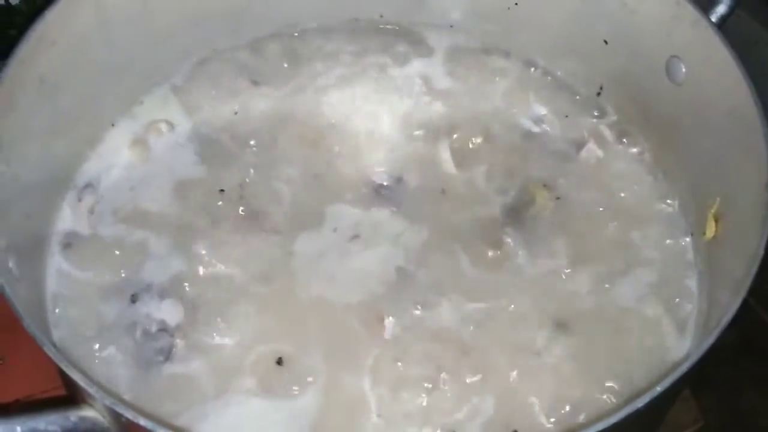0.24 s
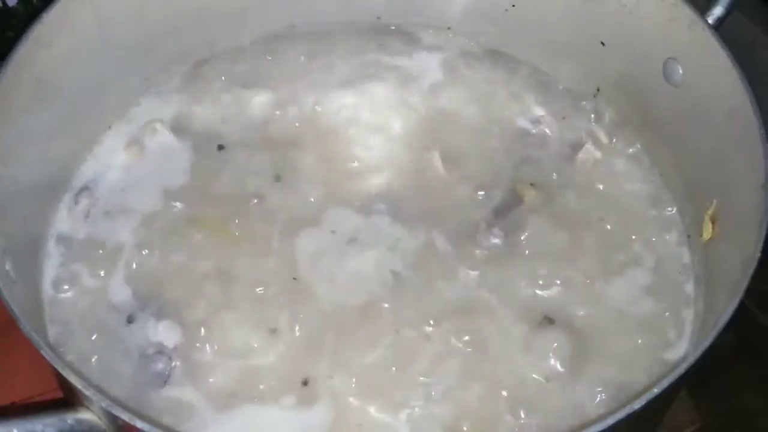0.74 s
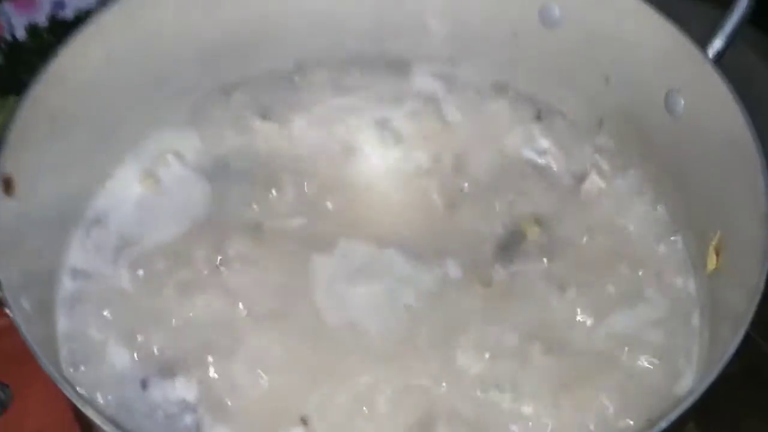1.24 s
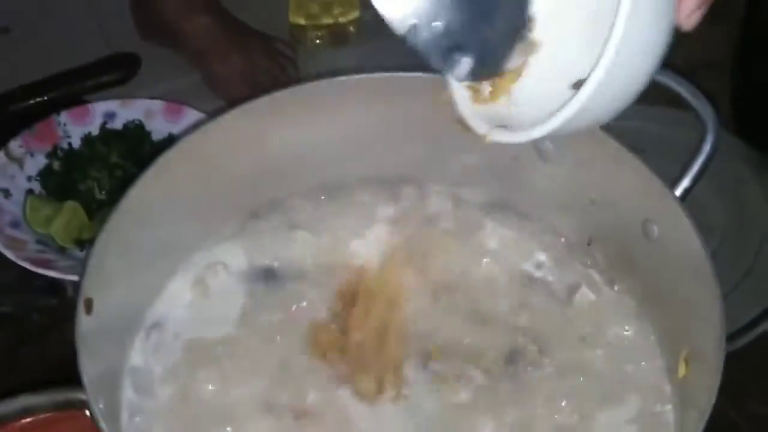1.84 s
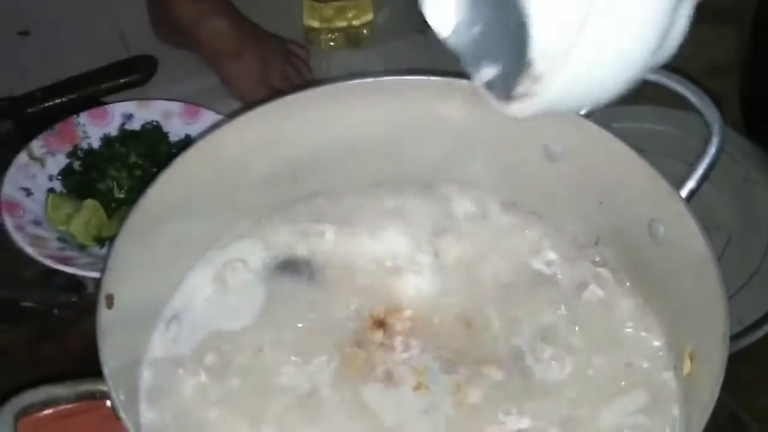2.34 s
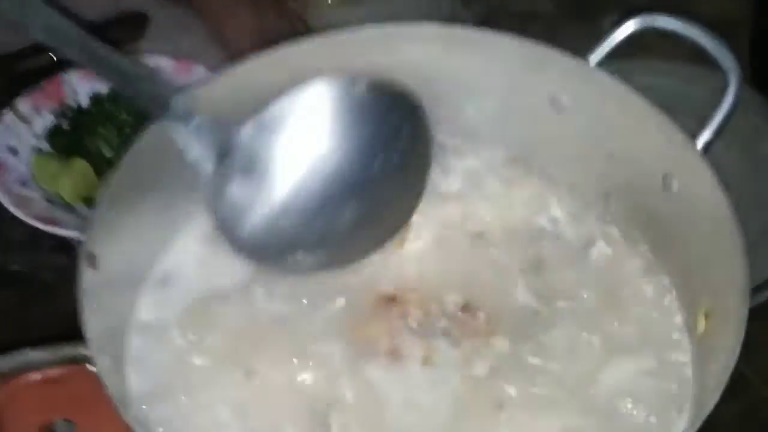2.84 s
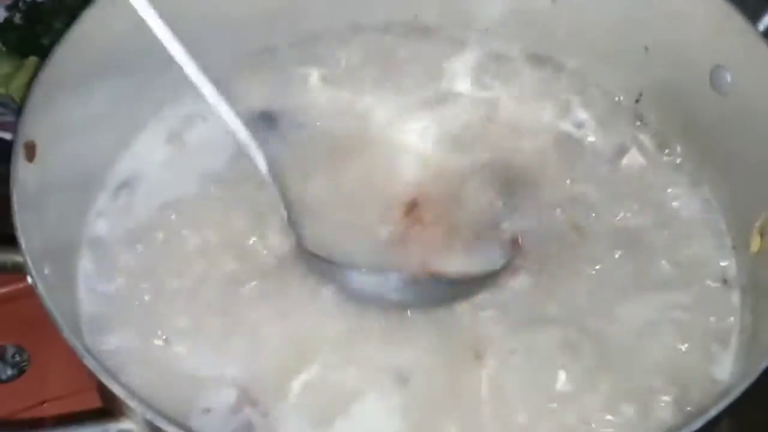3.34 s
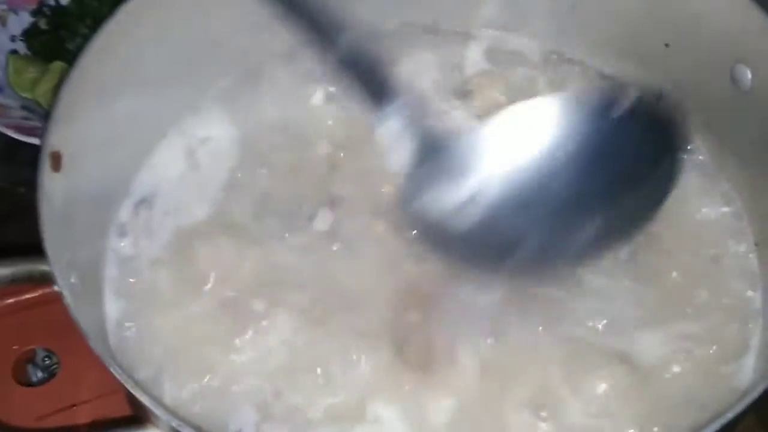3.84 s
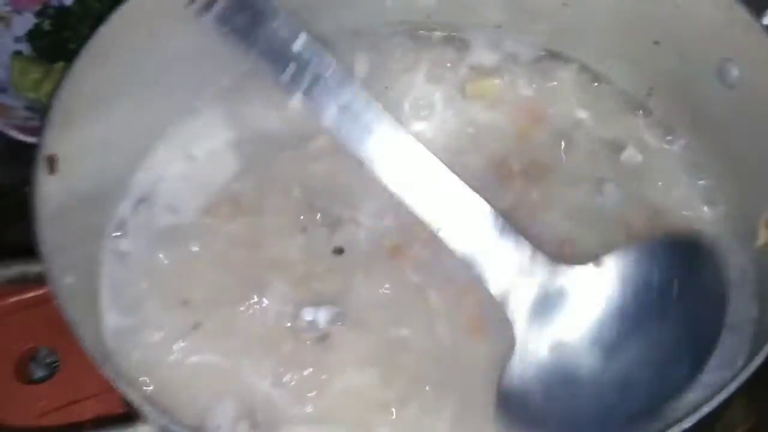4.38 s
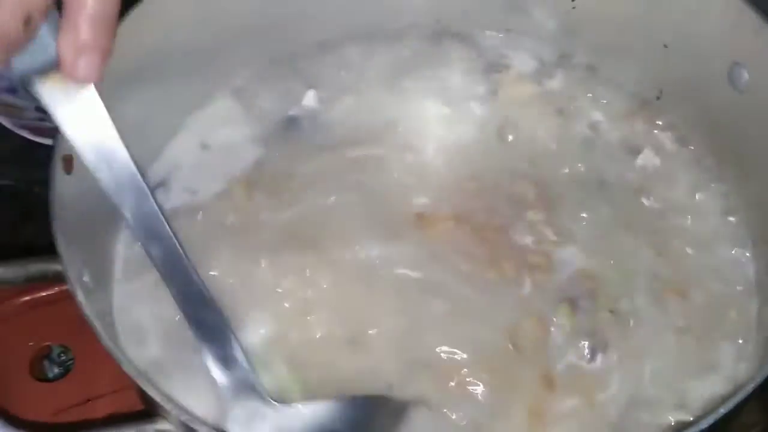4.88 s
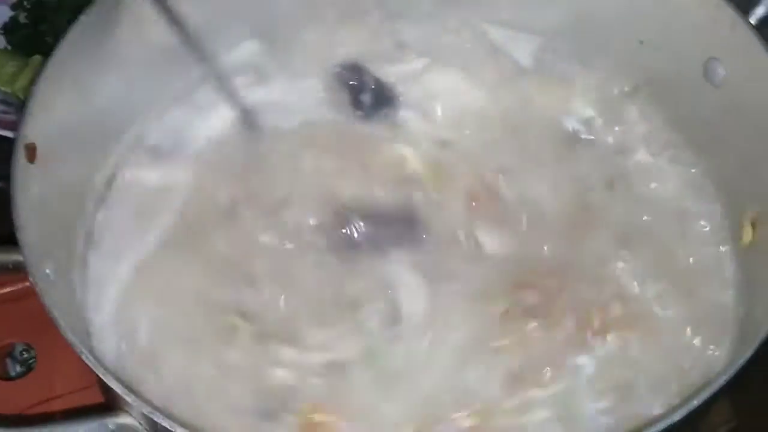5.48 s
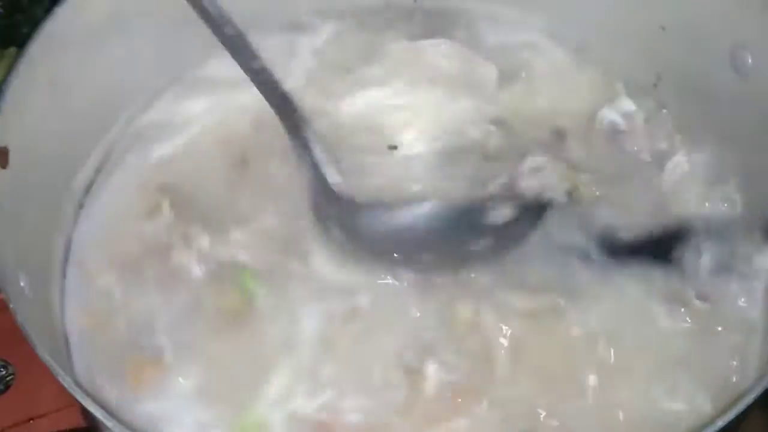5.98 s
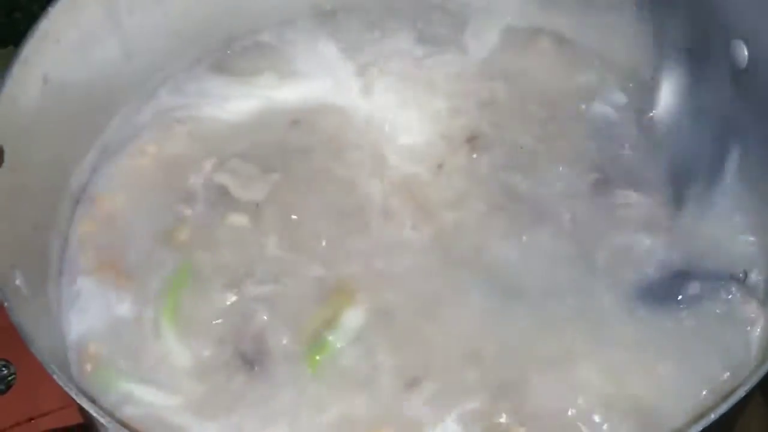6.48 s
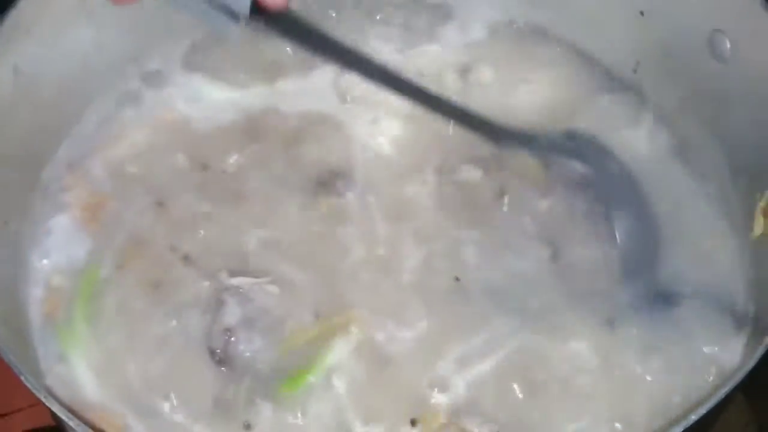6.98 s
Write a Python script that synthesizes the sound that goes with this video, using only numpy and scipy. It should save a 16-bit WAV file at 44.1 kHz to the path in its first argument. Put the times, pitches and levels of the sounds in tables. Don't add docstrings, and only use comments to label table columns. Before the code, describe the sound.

Wet bubbles pop in a pot over a thin burner whistle and a far cricket. Ladle scrapes and ceramic clinks grow into a sharp cluster, then calmer stirring brings sloshing porridge, small drops spitting on metal, damped knocks and floor thuds, and a hard crack near the end. Close microphone in a small echoing kitchen, lopsided stereo with bright sound on the right, muffled handling rumble and finger ticks on the left, and gated noise.

```python
import sys
import numpy as np
from scipy import signal
from scipy.fft import rfft, irfft
from scipy.io import wavfile
from scipy.ndimage import uniform_filter1d

SR = 44100
rng = np.random.default_rng(int(sys.argv[2]) if len(sys.argv) > 2 else 0)


def volts_from_db(level):
    exponent = np.asarray(level, float) / 20
    return 10 ** exponent


def store_wav(level_fs):
    pcm = np.round(np.clip(np.atleast_2d(level_fs), -1, 1) * 32767)
    wavfile.write(sys.argv[1], SR, pcm.T.astype(np.int16))


N = 318402
T = np.arange(N) / SR


def evened(x):
    return x / np.sqrt(np.mean(x ** 2) + 1e-20)


def read(points, hz):
    f, value = np.transpose(points)
    return np.interp(np.log(hz + 1), np.log(f + 1), value)


def add(mix, s, sound):
    part = mix[max(round(s * SR), 0):][:len(sound)]
    part += sound[:len(part)]


def noise(colour, size, patchy_db, flicker_db):
    frames, hz = 4 * N // size + 5, np.fft.rfftfreq(size, 1 / SR)
    a, b, patches = rng.standard_normal((frames, len(hz), 3)).T
    patches = uniform_filter1d(uniform_filter1d(patches, size=3, axis=0), size=60, axis=1)
    flicker = np.minimum(rng.exponential(1, frames), 3)
    level_db = read(colour, hz)[:, None] + patchy_db * evened(patches) + flicker_db * flicker
    z = (a + 1j * b) * volts_from_db(level_db)
    return evened(signal.istft(z, nperseg=size, noverlap=3 * size // 4)[1][:N])


def grit(count, centre_hz, octaves, lumpy_db):
    hz = np.fft.rfftfreq(count, 1 / SR) + 1
    lumps_db = lumpy_db * np.interp(hz, np.arange(120) * 190, rng.standard_normal(120))
    offset = np.abs(np.log2(hz / centre_hz) / max(octaves, .1))
    colour = volts_from_db(lumps_db) * np.exp(-.4 * offset ** 3 - hz / 15000)
    return evened(irfft(rfft(rng.standard_normal(count)) * colour))


def bubble(hz, cycles):
    t = np.arange(900) / SR
    u = t * hz / cycles
    return u * np.exp(1 - u) * np.sin(2 * np.pi * hz * t)


def slow_waver():
    return evened(uniform_filter1d(rng.standard_normal(N), size=2000))


def stroke(start, end, db, centre_hz, fade_db):
    count = 2 * round((end - start) * SR / 2)
    octaves = base_octaves(fade_db, db)
    return count, octaves


def rub(out, start, end, db, centre_hz, fade_db, octaves):
    octaves = octaves + .04 * (db + 50)
    count = 2 * round((end - start) * SR / 2)
    gusts = uniform_filter1d(rng.exponential(1, 20000) ** 3, size=250)[:count]
    gust_db = 2.2 * evened(gusts - 6)
    wet = grit(20000, centre_hz, octaves, lumpy_db=np.clip(-db / 5 - 6, 2, 6))[:count]
    for when, pitch, size in rng.random((60, 3))[:int(110 * (end - start))]:
        hz = centre_hz * 2 ** (octaves * (2.4 * pitch - 1.2))
        add(wet, when * count / SR, volts_from_db(7 * size ** 2) * bubble(hz, cycles=3.5))
    shape = volts_from_db(db - fade_db * np.linspace(0, 1, count) + gust_db) * signal.windows.tukey(count, .3)
    add(out, start, shape * evened(wet))


# start [t/s], end [t/s], rms [level/dB], centre [f/Hz], fade [dB]
SCRAPES = [(0, .2, -48, 6300, 30), (0.423, 0.778, -44.5, 5490, 2), (0.778, 0.894, -61.5, 5900, 0),
           (0.9, 1.054, -52, 6500, -0.5), (1.023, 1.345, -41, 7600, 15), (1.431, 1.714, -44.5, 6000, 23.5),
           (1.734, 1.813, -45, 6160, -2.5), (1.846, 1.948, -34, 5750, 9), (2.5, 2.75, -61.5, 5490, 2.5),
           (4.069, 4.26, -58.5, 5900, 3), (4.27, 4.45, -56, 6200, 6), (4.53, 4.66, -54, 4800, 10),
           (4.717, 4.822, -55, 6800, -3.5), (4.842, 5.13, -52, 5600, 10), (5.553, 5.62, -64, 8200, 5),
           (6.055, 6.148, -55, 5000, 10), (6.295, 6.375, -60.5, 6300, 6), (6.475, 6.72, -38, 4200, 16),
           (6.69, 6.92, -54, 5500, 6), (7.068, 7.212, -57, 7860, 15)]


def scrapes():
    out = np.zeros(N)
    for start, end, db, centre_hz, fade_db in SCRAPES:
        rub(out, start, end, db, centre_hz, fade_db, octaves=.86)
    return out


# start [t/s], end [t/s], rms [level/dB], centre [f/Hz]
SLOSHES = [(0, 0.075, -49, 1466), (0.559, 0.73, -55, 1400), (.67, 0.786, -54, 750), (.85, .97, -60, 900),
           (1.05, 1.257, -50, 512), (1.085, 1.326, -47.5, 1210), (1.425, 1.62, -48, 950),
           (2.27, 2.458, -48, 700), (4.269, 4.459, -47.5, 2596), (4.36, 4.5, -45, 560),
           (4.81, 5.05, -48, 600), (5.27, 5.43, -54, 750), (6.73, 6.9, -47, 330), (4.512, 4.68, -45, 640),
           (5.69, 5.793, -51, 950), (5.692, 5.798, -52.5, 1750), (6.23, 6.436, -48, 950),
           (6.26, 6.402, -60, 411), (6.47, 6.675, -41, 900), (7.012, 7.22, -49, 1510)]


def sloshes():
    out = np.zeros(N)
    for start, end, db, centre_hz in SLOSHES:
        rub(out, start, end, db, centre_hz, fade_db=13, octaves=.55)
    return out


# time [t/s], level [dB]
WHISTLE = [(0, -63.5), (1.0, -67), (2.6, -80), (3.35, -80), (3.55, -68), (7.22, -66.5)]


def whistle():
    waver = slow_waver()
    level = volts_from_db(np.interp(T, *np.transpose(WHISTLE)) + 4) * (1 + 0.2 * waver[::-1])
    return level * np.sin(2 * np.pi * np.cumsum(1688 + 6.0 * waver) / SR)


# frequency [f/Hz], density [level/dB per Hz]
ROOM_AIR = [(20, -15.5), (60, 15.5), (150, -8), (400, -17.5), (1800, -15.5), (4000, -11), (14000, -16.5)]


def room_air():
    return volts_from_db(-70) * noise(ROOM_AIR, size=1024, patchy_db=3.5, flicker_db=1.5)


def fizz():
    out = np.zeros(N)
    for when, pitch, size, cycles in rng.random((260, 4)):
        grain = bubble(1800 * 2 ** (2.9 * pitch), 2 + 9 * cycles)
        add(out, when * N / SR, volts_from_db(-68 + 11 * size ** 3) * grain)
    return out


# start [t/s], hold [s], level [dB]
HAND_SHIFTS = [(0.03, .06, -37), (.17, .04, -41), (.37, .11, -40), (.64, .05, -47), (1.12, .07, -33),
               (1.32, .09, -26), (1.6, .08, -31), (1.78, .13, -28), (2.26, .04, -46), (2.46, .03, -33.5),
               (2.64, .1, -43), (2.84, .19, -33), (3.22, .11, -37), (3.42, .11, -44), (3.79, .04, -47),
               (3.97, .04, -40.5), (4.35, .12, -38), (4.95, .2, -61), (5.3, .04, -53), (5.49, .04, -41),
               (5.88, .15, -67), (6.34, .2, -54), (6.62, .12, -47), (6.92, .21, -49)]


def grip_db():
    grab_db_per_s, ease_db_per_s, still_db = 300, 150, -70
    t = T[::64]
    moves = []
    for s, hold, db in HAND_SHIFTS:
        before_s, after_s = np.maximum(s - t, 0), np.maximum(t - s - hold, 0)
        moves.append(db - grab_db_per_s * before_s - ease_db_per_s * after_s)
    return np.interp(T, t, np.maximum(np.max(moves, axis=0), still_db))


# frequency [f/Hz], density [level/dB per Hz]
RUMBLE = [(20, -37.5), (40, -15.5), (62, 5), (90, -3), (200, -24), (500, -41), (1200, -58), (9000, -110)]


def hand_rumble():
    return volts_from_db(grip_db()) * noise(RUMBLE, size=2048, patchy_db=1.5, flicker_db=-0.5)


def cricket():
    start_s, every_s = .115, .36
    phase_s = (T - start_s) % every_s
    chirp = volts_from_db(-62 - 110 * phase_s) * np.clip(phase_s / .01, 0, 1)
    trill = 1 + .6 * np.sin(2 * np.pi * 45 * T)
    return chirp * trill * np.sin(2 * np.pi * np.cumsum(13550 + 40 * slow_waver()) / SR)


# time
# [t/s], peak [level/dB], pitch [f/Hz]
SMALL_PLOPS = [(0.229, -56, 1155), (0.313, -45.5, 1080), (0.51, -52.5, 1210), (0.683, -46, 990),
               (1.029, -51, 1140), (1.144, -32, 1110), (1.222, -41, 1190), (1.765, -52.5, 1180),
               (2.035, -31.5, 900), (2.08, -38, 1030), (2.143, -31, 1120), (2.208, -34, 950),
               (.72, -53, 1200), (.872, -55, 1150), (.885, -56, 850), (1.247, -45, 800),
               (2.769, -36.5, 1170), (2.919, -42, 1317), (2.948, -39.5, 1734), (2.991, -29.5, 966),
              (3.187, -46, 1148), (3.416, -41.5, 1482), (3.425, -42.5, 1070), (3.687, -54, 1620),
              (3.807, -48, 1044), (4.136, -33, 935), (4.349, -45, 1110), (4.436, -35, 1104),
              (4.681, -50, 1100), (4.938, -45, 1075), (5.835, -46, 1163), (6.304, -50.5, 910),
              (6.346, -46, 927), (6.536, -42.5, 1720), (6.658, -46, 1800), (7.074, -32.5, 944)]
# time [t/s], peak [level/dB], pitch [f/Hz]
DEEP_PLOPS = [(0.358, -56, 694), (0.399, -48, 590), (0.855, -52.5, 433), (1.195, -40, 521),
              (1.522, -43, 577), (1.891, -43.5, 515), (1.932, -44.5, 522), (2.02, -32.5, 576),
              (2.783, -44, 516), (3.207, -42.5, 483), (3.219, -33.5, 777), (3.269, -46.5, 384),
              (3.569, -55.5, 620), (3.869, -48, 582), (4.753, -54.5, 690), (4.976, -42.5, 571),
              (5.202, -46.5, 420), (5.583, -40.5, 527), (6.196, -57, 563), (6.698, -35.5, 640),
              (7.049, -47, 464), (7.108, -50, 552)]


def plops():
    out, t = np.zeros(N), np.arange(8192) / SR
    for s, db, hz in DEEP_PLOPS + SMALL_PLOPS:
        t60_s = .018 - .0007 * (db + 43)
        u = t / max(t60_s, .004) * np.log(1000)
        turns = np.cumsum(hz * 2 ** (.07 * np.minimum(u, 5) - .1)) / SR
        pop = u ** 2 * np.exp(2 - 2 * u) * np.sin(2 * np.pi * turns)
        wash = volts_from_db(-16.5 - 60 * t / 0.17) * (1 - np.exp(-t / .003))
        spatter = wash * grit(len(t), 1.05 * hz, .45, lumpy_db=4)
        add(out, s - .001, volts_from_db(db + 9) * (pop + spatter))
    return out


def crack(t, db, centre_hz, t60_s, width):
    octaves = read(width, centre_hz) * (1 + 0.7 * np.clip(db / 15 + 1, 0, 1))
    decay = volts_from_db(-60 * t / max(t60_s, .004)) + 0.4 * volts_from_db(-60 * t / 0.0027)
    return decay * grit(len(t), centre_hz, octaves, lumpy_db=np.clip(1.5 - db / 11, 2, 5))


# frequency [f/Hz], level [dB], t60 [s]
BOWL_MODES = [(1447, -14, .2), (1529, -6, .3), (1599, -8, .3), (2789, -16, .16), (3908, -9, .3),
              (4230, -12, .12), (4570, -5, .12), (5367, -7, .1), (5717, -15, .14), (6966, -10, .2),
              (7170, -1, .11), (7290, -5, .16), (8032, -12, .12), (10790, -12, .14)]


def bowl_ring(t):
    jitter = evened(uniform_filter1d(rng.standard_normal(len(t)), size=150))
    rattle_s = t + .012 * np.cumsum(jitter) / SR
    ring = np.zeros(len(t))
    for hz, db, t60_s in BOWL_MODES * 3:
        weaker, phase, detune = rng.random(3)
        turns = hz * (1 + .022 * (detune - .5)) * rattle_s + phase
        ring += volts_from_db(db - 2 - 9.8 * weaker - 60 * t / min(t60_s, .3)) * np.sin(2 * np.pi * turns)
    return ring


# time [t/s], peak [level/dB], centre [f/Hz], crack t60 [s], ring [level/dB]
BOWL_CLINKS = [(0.3466, -48, 1680, 0.014, -2.5), (0.4175, -25, 6980, 0.075, -20),
               (0.909, -30.5, 5350, 0.036, -15), (1.0345, -32, 7000, 0.03, -29),
               (1.0427, -24, 7000, 0.03, -28), (1.0851, -22.5, 7030, 0.013, -20),
               (1.3586, -20, 1280, 0.05, -30), (1.358, -36, 6000, .02, -30), (1.4233, -17, 6300, 0.03, -12),
               (1.4245, -27, 1300, .12, -30), (1.6046, -41.5, 7400, 0.02, -15),
               (1.672, -42.5, 7100, 0.045, -13), (1.7384, -39, 3330, 0.029, -11),
               (1.8272, -25.5, 5660, 0.013, -22), (1.847, -33.5, 4646, 0.017, -30),
               (1.9457, -17, 6780, 0.008, -25), (2.0128, -12.5, 5600, 0.028, -17),
               (2.032, -16, 6540, 0.013, -24), (2.142, -17, 4500, 0.041, -20),
               (2.2031, -24, 4500, 0.07, -15), (2.2738, -12, 1700, 0.03, -3), (2.274, -15, 6500, 0.1, -30),
               (2.2838, -2, 7000, 0.013, -16.5), (2.4518, -34, 1640, 0.026, -9.5)]
# centre [f/Hz], width [octaves]
BOWL_WIDTH = [(1200, .36), (1650, .36), (3500, .95), (7000, .85)]


def bowl_clinks():
    out, t = np.zeros(N), np.arange(12000) / SR
    for s, db, centre_hz, t60_s, ring_db in BOWL_CLINKS:
        blow = crack(t, db, centre_hz, t60_s, BOWL_WIDTH)
        if ring_db > -22:
            blow = blow + volts_from_db(ring_db) * bowl_ring(t)
        add(out, s, volts_from_db(db + 1) * blow * (1 - np.exp(-t * 1700)))
    return out


# time [t/s], peak [level/dB], top [f/Hz]
TICKS = [
    (1.244, -48.5, 900),
    (1.553, -25, 4750),
    (3.272, -37, 800),
    (3.69, -48, 500),
    (4.383, -30.5, 2020),
    (5.443, -24, 2940),
    (5.45, -16, 4000),
]


def finger_ticks():
    out, t = np.zeros(N), np.arange(8000) / SR
    for s, db, top_hz in TICKS:
        push = (1 - t * top_hz * 1.15) * np.exp(-t * top_hz * 0.83)
        push -= .5 * np.sin(2 * np.pi * 150 * t) * np.exp(-t / 0.0015)
        tail = signal.lfilter([.25], [1, -.75], rng.standard_normal(len(t))) * volts_from_db(-30.5 - 60 * t / 0.9)
        add(out, s, volts_from_db(db) * signal.lfilter([.16], [1, -1.2, .36], push + tail))
    return out


# time [t/s], peak [level/dB], pitch [f/Hz], t60 [s]
BUMPS = [
    (1.249, -30.5, 65.6, 0.16),
    (1.321, -22, 70, 0.12),
    (2.436, -36, 86.7, 0.09),
    (3.924, -43, 60.3, 0.38),
    (5.456, -37, 57.1, 0.085),
]


def grip_bumps():
    out, t = np.zeros(N), np.arange(8000) / SR
    for s, db, hz, t60_s in BUMPS:
        decay = volts_from_db(db + 14 - 60 * t / t60_s) * (1 - np.exp(-t / 0.0014))
        add(out, s, decay * np.sin(2 * np.pi * hz * t))
    return out


# time [t/s], peak [level/dB], centre
# [f/Hz], width [octaves]
DRIPS_AND_GRAINS = [(1.453, -27, 4500, .9), (1.759, -32, 7040, .5), (1.79, -35, 7020, .5), (1.876, -34, 4500, .6),
                    (1.892, -33, 7000, .7), (1.915, -35, 8000, .5), (2.557, -52, 9500, .3), (2.652, -52, 6440, .2),
                    (2.687, -48, 6500, .5), (2.704, -51, 6500, .35), (2.727, -52, 4700, .15), (2.791, -47, 6730, .5),
                    (3.06, -52, 10500, .2), (3.18, -43, 5600, .25), (3.215, -46, 10300, .2), (3.255, -53, 6500, .12),
                    (3.312, -50, 6500, .3), (3.388, -48, 6300, .15), (3.43, -48, 6000, .25), (3.465, -50, 11000, .15),
                    (3.547, -39, 4100, .22), (3.591, -47, 2300, .25), (3.62, -47, 4020, .18), (3.761, -46, 6800, .35),
                    (3.797, -49, 4550, .25), (3.807, -44, 5500, .4), (3.898, -47, 4410, .17), (3.939, -47, 6320, .2),
                    (3.952, -48, 6300, .25), (3.962, -49, 6500, .2), (4.116, -43, 6000, .4), (4.16, -43, 9500, .3),
                    (4.249, -48, 3660, .2), (4.318, -47, 9500, .5), (4.553, -43, 5520, .15), (4.59, -47, 5820, .15),
                    (4.749, -44, 7500, .5), (4.764, -45, 6600, .2), (4.821, -38, 4000, .9), (4.942, -42, 4640, .4),
                    (5.065, -46, 6300, .3), (5.209, -50, 3680, .15), (5.552, -39, 8000, .5), (6.058, -37, 5000, .6),
                    (6.21, -47, 4090, .2), (6.814, -40, 6000, .7), (6.84, -44, 4500, .5), (7.199, -50, 4200, .25),
                    (1.424, -21, 3950, .12), (5.284, -41, 6000, .5), (5.299, -40, 3500, .9), (5.318, -43, 6500, .6),
          (5.358, -46, 5000, .8), (5.387, -48, 4000, .6), (5.711, -40, 2000, .8), (5.715, -50, 6800, .12),
          (5.768, -42, 1900, .45), (5.853, -42, 1200, .35), (5.84, -54, 4800, .15), (5.84, -55, 9600, .1),
          (6.014, -58, 850, .2), (6.229, -42, 3800, .3), (6.303, -44, 1800, .6), (6.347, -45, 1600, .6),
          (6.49, -27, 1900, .3), (6.536, -32, 2200, .8), (6.583, -37, 2500, .9), (6.718, -43, 5000, .7),
          (6.748, -38, 4440, .5), (7.14, -48, 9000, .4)]


def drips_and_grains():
    out, t = np.zeros(N), np.arange(6000) / SR
    tick_t60_s, spray_db, spray_t60_s = .012, -15, .16
    fade = volts_from_db(-60 * t / tick_t60_s) + volts_from_db(spray_db - 60 * t / spray_t60_s)
    fade = fade * (1 - np.exp(-t / .0005))
    for s, db, centre_hz, octaves in DRIPS_AND_GRAINS:
        add(out, s, volts_from_db(db + 3) * fade * grit(len(t), centre_hz, octaves, lumpy_db=6))
    return out


# start [t/s], steps [count], rate [steps/s], level [dB]
MOTOR = [
    (2.052, 3.8, 11.8, -51),
    (4.728, 8.6, 14.1, -53.5),
]


def focus_motor():
    out, t = np.zeros(N), np.arange(8000) / SR
    hum = np.sin(2 * np.pi * 187 * t) + 0.23 * np.sin(2 * np.pi * 374 * t)
    step = np.exp(-.5 * ((t - .03) / .009) ** 2) * hum
    for s, steps, per_s, db in MOTOR:
        for k in range(int(steps)):
            add(out, s - .03 + k / per_s, volts_from_db(db) * step)
    return out


# time [t/s], peak [level/dB], centre [f/Hz], crack t60 [s]
POT_KNOCKS = [(2.5997, -44, 5646, 0.026), (2.802, -38, 6800, 0.03), (3.3915, -34, 1500, 0.024),
              (4.0868, -34.5, 5095, 0.026), (4.1954, -38, 4760, 0.049), (4.5102, -28, 1300, 0.06),
              (4.5108, -39, 4500, .03), (4.706, -40, 8500, 0.03), (4.8097, -35.5, 2210, 0.12),
              (4.8383, -28, 4320, 0.013), (5.024, -40, 5850, 0.026), (5.2706, -31.5, 2100, 0.13),
              (5.691, -35, 1600, 0.1), (6.0464, -36, 1000, 0.03), (6.2303, -34, 1500, 0.07),
              (6.4689, -1.5, 6200, 0.017), (6.7643, -34.5, 5500, 0.025), (7.0085, -34, 1700, 0.076),
              (7.0704, -41.5, 7540, 0.042)]
# centre [f/Hz], width [octaves]
POT_WIDTH = [(1300, .65), (2000, .95), (4500, .6), (5600, .75), (8000, .5)]


def pot_knocks():
    out, t = np.zeros(N), np.arange(12000) / SR
    for s, db, centre_hz, t60_s in POT_KNOCKS:
        blow = crack(t, db, centre_hz, t60_s, POT_WIDTH)
        add(out, s, volts_from_db(db + 1) * blow * (1 - np.exp(-t * 1700)))
    return out


# time [t/s], rms [level/dB], t60 [s]
THUDS = [
    (4.511, -43, 0.15),
    (4.806, -37, 0.6),
    (5.199, -51, 0.4),
    (6.47, -36, 0.35),
    (6.728, -33, 0.36),
]
# frequency [f/Hz], density [level/dB per Hz]
PUFF = [(20, -22.5), (60, -1), (120, -6.5), (250, -4.5), (450, -15.5), (900, -47.5)]


def pot_thuds():
    swell = np.zeros(N)
    for s, db, t60_s in THUDS:
        swell += volts_from_db(db - 60 * np.maximum(T - s, 0) / t60_s) * np.clip((T - s) / .004, 0, 1)
    return swell * noise(PUFF, size=1024, patchy_db=3, flicker_db=1.8)


# frequency [f/Hz], t60 [s]
KITCHEN = [(300, 0.51), (1000, 0.46), (3000, 0.31), (8000, 0.3), (14000, 0.33)]


def kitchen(x):
    taps = np.zeros(SR // 2)
    at = np.arange(300, len(taps) - 20, 20)
    taps[at + rng.integers(0, 20, len(at))] = rng.choice([-1., 1.], len(at))
    hz, t, z = signal.stft(taps, SR, nperseg=256)
    decay = volts_from_db(-60 * t / read(KITCHEN, hz)[:, None])
    tail = signal.istft(z * decay, SR, nperseg=256)[1]
    return signal.fftconvolve(x, tail / np.linalg.norm(tail))[:N]


def under_hand(heard, air):
    case = finger_ticks() + grip_bumps() + focus_motor()
    muffled = volts_from_db(-25) * signal.lfilter([.16], [1, -1.2, .36], np.roll(heard, 6))
    dull = signal.butter(10, 7300, fs=SR, output="sos")
    return signal.sosfilt(dull, case + muffled + volts_from_db(-10) * air[::-1])


def scene():
    hits = scrapes() + sloshes() + fizz() + plops() + bowl_clinks() + drips_and_grains() + pot_knocks()
    heard = hits + volts_from_db(-9) * kitchen(hits) + whistle() + cricket()
    air = room_air()
    left = hand_rumble() + under_hand(heard, air)
    right = pot_thuds() + heard + air
    return np.array([left, right])


# frequency [f/Hz], level [dB]
GATE = [(100, -30), (400, -11), (1000, 0), (4000, -2), (14000, -7.5)]


def gate(x, shut_db, depth_db, release_db_per_s, wander_db):
    hz, t, z = signal.stft(x, SR, nperseg=512, noverlap=384)
    power = uniform_filter1d(uniform_filter1d(abs(z) ** 2, size=5, axis=1), size=3, axis=2)
    wander = uniform_filter1d(rng.standard_normal(z.shape), size=4, axis=1)
    wander = evened(uniform_filter1d(wander, size=36, axis=2))
    over_db = 10 * np.log10(abs(power) + 1e-20) - shut_db - read(GATE, hz)[:, None]
    release_db = release_db_per_s * t
    gain_db = np.clip(2.5 * over_db, -depth_db, 0) + release_db
    gain_db = np.maximum.accumulate(gain_db, axis=2) - release_db
    quiet = np.clip(1 - over_db / 45, 0, 1) * (hz > 400)[:, None]
    gain_db = gain_db - wander_db * quiet * np.maximum(wander, 0) ** 2
    return signal.istft(z * volts_from_db(gain_db), SR, nperseg=512, noverlap=384)[1][:, :N]


def roll_off(x):
    return signal.sosfilt(signal.butter(12, 15480, fs=SR, output="sos"), x)


def record(dry):
    cut = signal.sosfilt(signal.butter(3, 45, "high", fs=SR, output="sos"), dry)
    gated = gate(np.tanh(cut), shut_db=-89, depth_db=7, release_db_per_s=249, wander_db=7.0)
    kept = signal.oaconvolve(gated, signal.firwin(255, 14450, fs=SR)[None], "same")
    return roll_off(kept + volts_from_db(-41.5) * (gated - kept))


dry = scene()
out = record(dry)
store_wav(out)
```